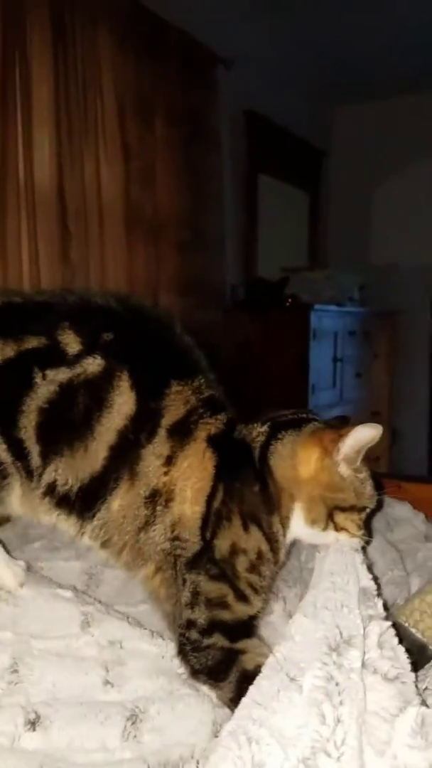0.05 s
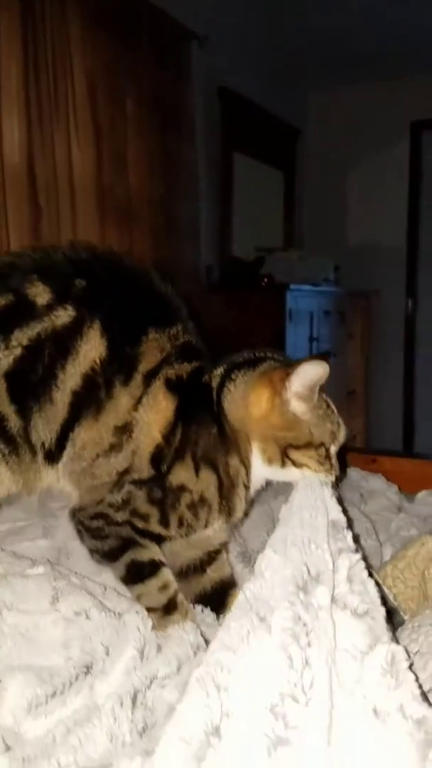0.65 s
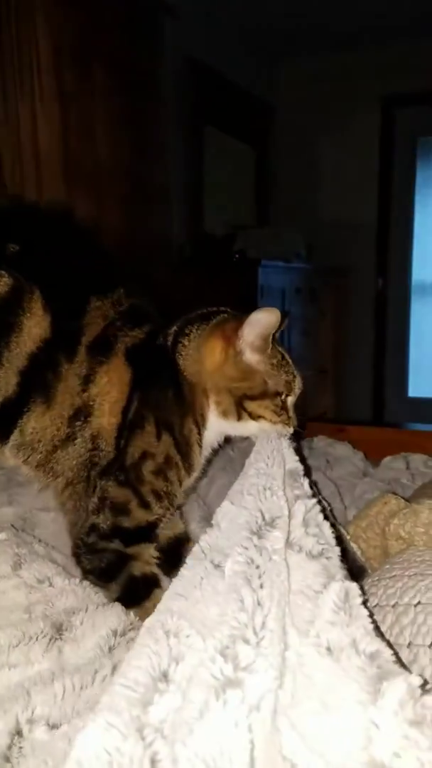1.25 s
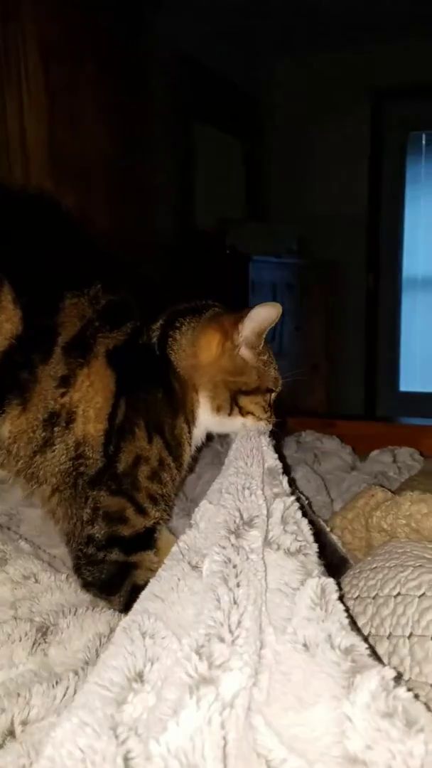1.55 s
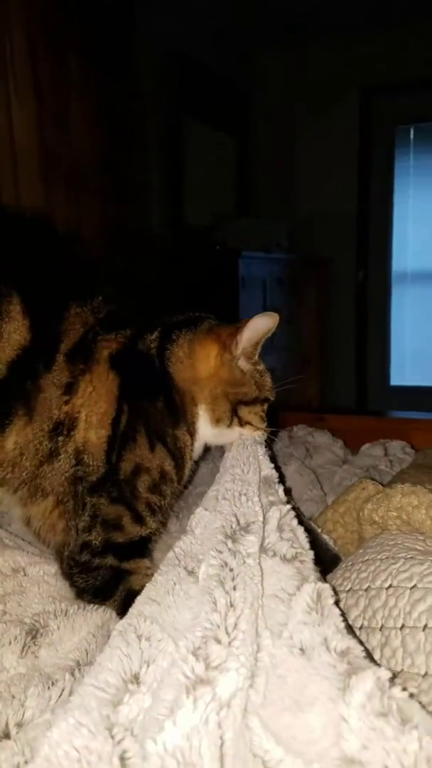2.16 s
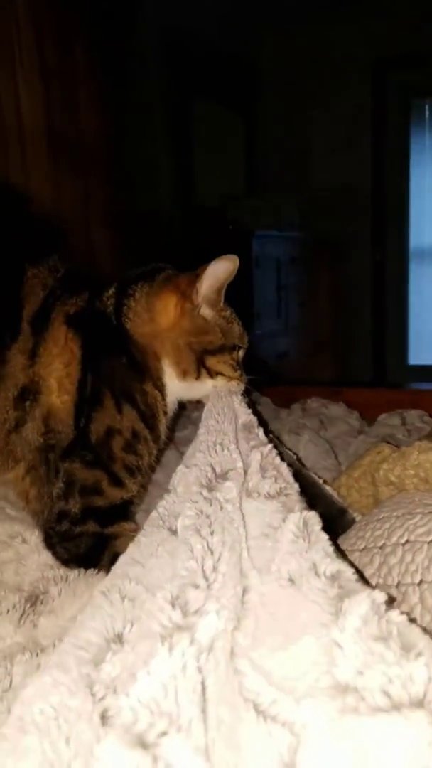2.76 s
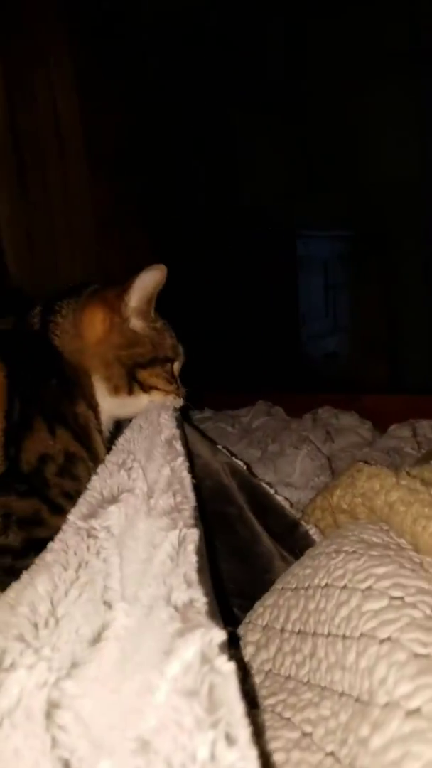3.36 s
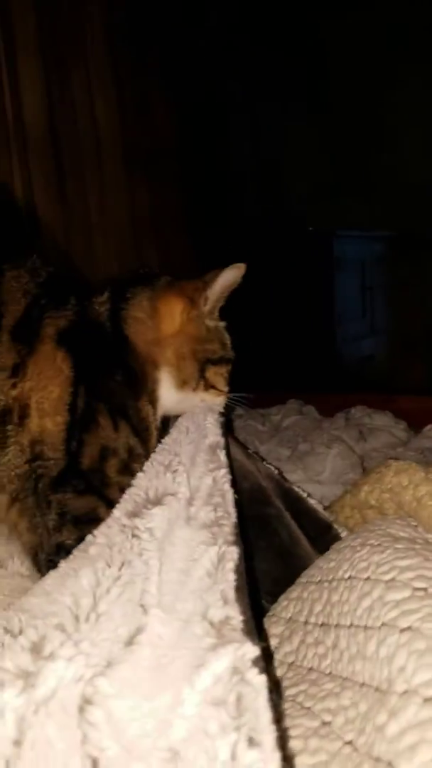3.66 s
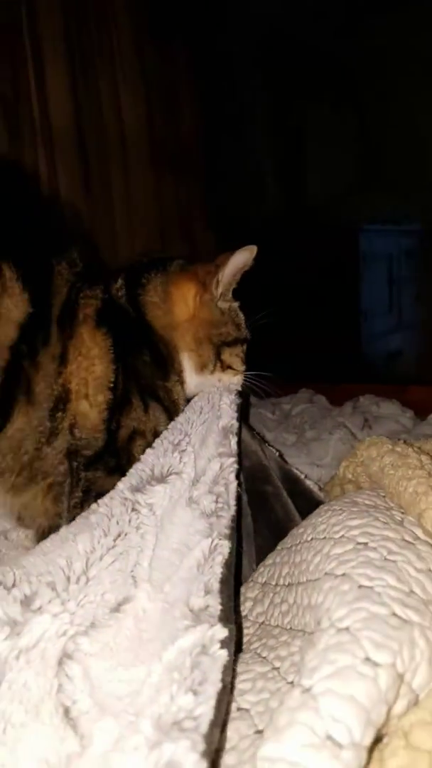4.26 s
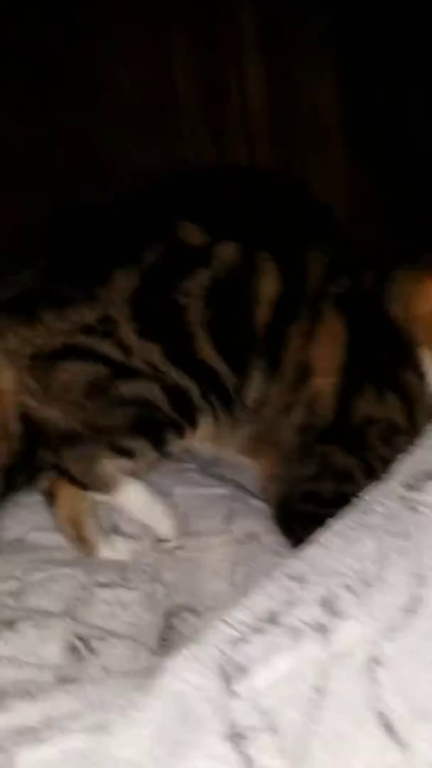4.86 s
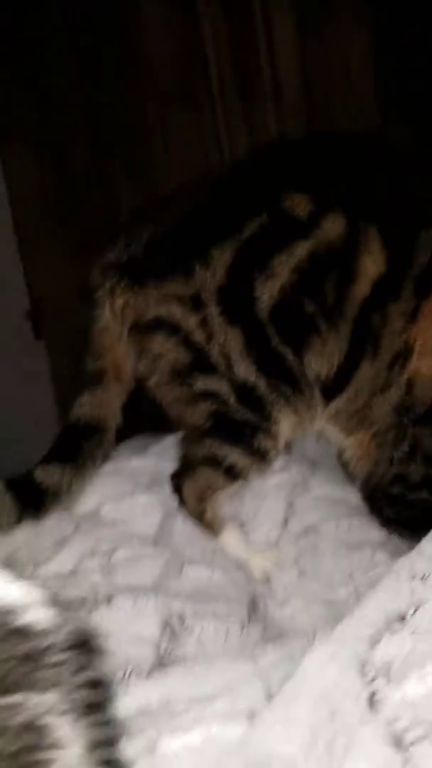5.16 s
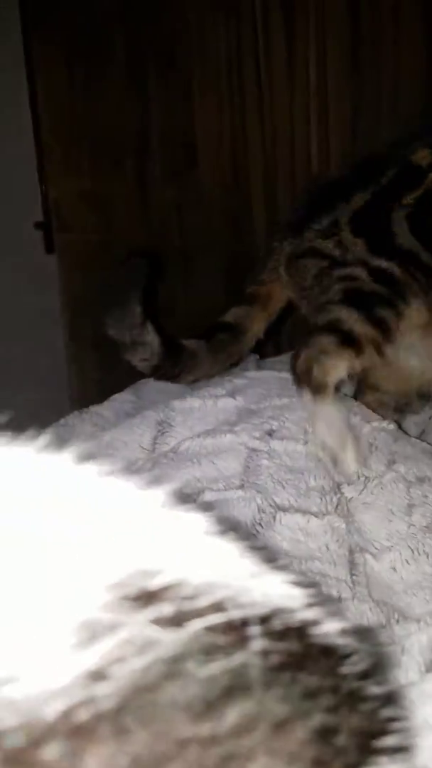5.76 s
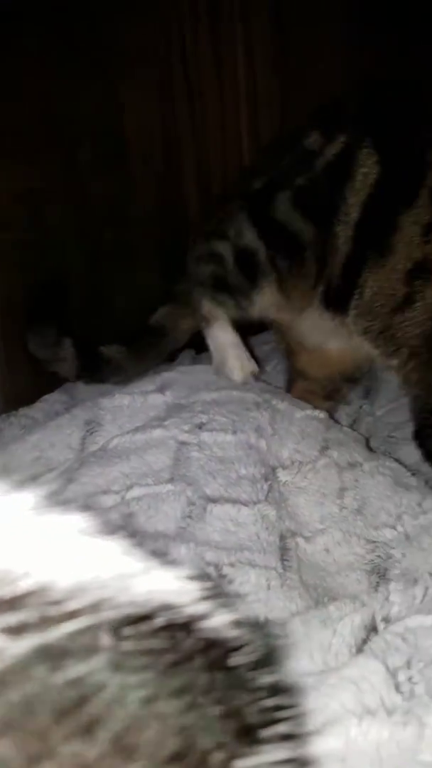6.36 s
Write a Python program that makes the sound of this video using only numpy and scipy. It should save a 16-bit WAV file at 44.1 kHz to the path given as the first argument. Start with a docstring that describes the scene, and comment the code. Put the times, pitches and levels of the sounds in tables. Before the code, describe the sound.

A fan hums quietly in a bedroom while a handheld phone gets soft bumps, a brief fabric swish and one sharp pop.

```python
"""A fan hums and rushes in a quiet bedroom, over a low house rumble and faint microphone hiss.
A cat tugs silently at a plush blanket, close to a hand-held phone. The hand bumps the phone's case,
which thuds, rings and, at the hardest bump, clicks. About three seconds in, fabric swishes and
scrapes past the right microphone. Near the end, one sharp pop hits the left one."""
import sys
import numpy as np
from scipy.fft import rfft, irfft, next_fast_len
from scipy.io import wavfile
from scipy.ndimage import map_coordinates

SR = 44100
rng = np.random.default_rng(int(sys.argv[2]) if len(sys.argv) > 2 else 0)


def generate_wav(sig):
    """Save sig (samples, or channels by samples) to the path in sys.argv[1] as 16-bit PCM at SR."""
    pcm = np.round(np.clip(np.atleast_2d(sig).T, -1, 1) * 32767).astype(np.int16)
    wavfile.write(sys.argv[1], SR, pcm)


N = 287532
TIME_S = np.arange(N) / SR


def amp(db):
    """Turn decibels into a number to multiply by."""
    return 10 ** (np.asarray(db) / 20)


def unit(x):
    """Scale a sound to an average (rms) level of 1."""
    return x / np.sqrt(np.mean(x ** 2) + 1e-20)


def over_pitch(rows, hz):
    """Join (pitch_hz, value) rows into a curve, giving each octave equal room."""
    pitches, values = np.transpose(rows)
    return np.interp(np.log(hz + 1), np.log(pitches + 1), values)


def over_time(rows):
    """Join (time_s, value) rows into a curve, one value per sample."""
    return np.interp(TIME_S, *np.transpose(rows))


def wobble(rate):
    """A smooth curve through `rate` random values a second."""
    values = rng.standard_normal(int(N * rate / SR) + 4)
    return map_coordinates(values, [TIME_S * rate])


def swell(peak_s, rise_s, fall_s):
    """A smooth rise to 1 at peak_s and a smooth fall."""
    t = TIME_S - peak_s
    return np.exp(-(t / np.where(t < 0, rise_s, fall_s)) ** 2)


def filtered(x, response):
    """Multiply each frequency in a sound by response(hz)."""
    size = 2 * next_fast_len(N // 2 + SR // 4)
    hz = np.fft.rfftfreq(size, 1 / SR)
    return irfft(rfft(x, size) * response(hz), size)[..., :N]


def coloured(x, colour):
    """Give a sound a colour (its mix of low and high), at an average level of 1."""
    return unit(filtered(x, lambda hz: amp(over_pitch(colour, hz))))


def panned(x, balance_db):
    """Make the left side louder than the right by balance_db."""
    return x * np.vstack([amp(balance_db / 2), amp(-balance_db / 2)])


def tone(hz, drift):
    """A slightly unsteady tone at an average level of 1."""
    phase = 2 * np.pi * (hz * TIME_S + rng.random())
    return unit(np.sin(phase + drift * wobble(3.95)))


# How alike the room sounds at the two microphones: pitch_hz, likeness (0 to 1)
STEREO_LIKENESS = [(60, 1), (290, 0.72), (640, 0.15), (1400, 0.21), (3100, 0.097), (7000, 0)]

def room_noise(colour):
    """Noise from all around: both microphones share the bass but not the treble."""
    def shares(hz):
        angle = np.arccos(np.clip(over_pitch(STEREO_LIKENESS, hz), -1, 1)) / 2
        return np.array([np.cos(angle), np.sin(angle)])
    shared, opposite = filtered(rng.standard_normal((2, N)), shares)
    return coloured(np.array([shared + opposite, shared - opposite]), colour)


SHAFT_HZ, HUM_BALANCE_DB = 52.24, -2.5  # the fan's turns a second; the hum leans right
# The main motor tone, at 4 times the shaft speed: time_s, level_db
MAIN_TONE_LEVELS = [(0.0, -66), (1.2, -66.5), (1.5, -72), (1.87, -61.5), (2.2, -68), (2.92, -73),
                    (3.7, -62), (5.47, -66), (5.72, -61.5), (6.52, -79)]
# The upper motor tone, at 6 times the shaft speed: time_s, level_db
UPPER_TONE_LEVELS = [(0.0, -61), (0.49, -71), (0.87, -60), (1.03, -74.5), (1.85, -70.5), (2.27, -78),
                     (2.91, -76), (3.74, -74), (3.98, -67), (5.25, -71), (5.57, -63.5), (6.52, -72.5)]
# Tones on either side of the upper one that swell with it: shaft_multiple, average_level_db
NEIGHBOUR_TONES = [(5, -71.5), (7, -75.5)]

def fan_hum(waver_db=1.5, drift=0.5, follow=0.75):
    """Motor tones swell and sink as the phone crosses the room's loud and quiet spots (standing waves)."""
    main_db, upper_db = over_time(MAIN_TONE_LEVELS), over_time(UPPER_TONE_LEVELS)
    swing_db = follow * (upper_db - upper_db.mean())
    tones = [(4, main_db), (6, upper_db)]
    tones += [(multiple, db + swing_db) for multiple, db in NEIGHBOUR_TONES]
    hum = sum(amp(db + waver_db * wobble(7.1)) * tone(multiple * SHAFT_HZ, drift)
              for multiple, db in tones)
    return panned(hum, HUM_BALANCE_DB)


# The fan's weaker motor tones: shaft_multiple, level_db
WEAK_FAN_TONES = [(2, -71.5), (3, -69)]
# Other steady drones of the house: pitch_hz, level_db
HOUSE_DRONES = [(43.5, -69), (119.5, -68), (383, -78), (689, -79.5)]
# The colour of the rumble: pitch_hz, relative_db
RUMBLE_COLOUR = [(10, -22), (22, -8), (35, 5), (70, -1.5), (120, 4), (185, -1.5), (340, -2.5), (450, -3.5),
                 (700, -13.5), (1500, -42)]

def house_rumble(rumble_db=-61, waver_db=2.1, drift=0.64, fade_start_s=6.17, fade_db_per_s=15):
    """Weak drones waver over the low rumble of the house; both fade at the very end."""
    tones = [(multiple * SHAFT_HZ, db) for multiple, db in WEAK_FAN_TONES] + HOUSE_DRONES
    drones = sum(amp(db) * unit(amp(waver_db * wobble(2.63)) * tone(hz, drift)) for hz, db in tones)
    rumble = amp(rumble_db) * room_noise(RUMBLE_COLOUR)
    fade_db = fade_db_per_s * np.maximum(TIME_S - fade_start_s, 0)
    return panned(amp(-fade_db) * (drones + rumble), HUM_BALANCE_DB)


# The rush of air as the phone moves about the bed: time_s, level_db (before boost_db is added)
RUSH_LEVELS = [(0.0, -59.5), (2.38, -61), (2.89, -61), (3.12, -60), (4.81, -59), (6.52, -61.5)]
# The colour of the broad rush: pitch_hz, relative_db
RUSH_COLOUR = [(100, -15), (350, -10.5), (550, -3), (720, -3), (1000, 0), (1700, -1.5), (2200, -6.5),
               (3100, -11), (4400, -20), (6200, -26), (9000, -28), (16000, -46)]
# The colour of its narrow, hollow part: pitch_hz, relative_db
HOLLOW_COLOUR = [(400, -43), (600, -16), (690, 2), (900, 3), (1050, -15), (1600, -39)]

def fan_rush(boost_db=2, flutter_db=0.51, hollow_db=-69.5, hollow_growth=6):
    """The fan's rush of air: the louder it arrives, the hollower it sounds."""
    level_db = over_time(RUSH_LEVELS)
    broad = amp(level_db + boost_db + flutter_db * wobble(9.9)) * room_noise(RUSH_COLOUR)
    swing_db = hollow_growth * (level_db - level_db.mean())
    hollow = amp(hollow_db + swing_db) * room_noise(HOLLOW_COLOUR)
    return panned(broad + hollow, balance_db=2.5)


# The colour of the hiss: pitch_hz, relative_db
HISS_COLOUR = [(1000, -6), (5000, -5), (8000, -11.5), (10200, -8), (12500, -2), (15500, 0)]

def microphone_hiss(level_db=-70.5):
    """Each microphone makes its own faint hiss."""
    hiss = coloured(rng.standard_normal((2, N)), HISS_COLOUR)
    return panned(amp(level_db) * hiss, balance_db=2)


# The hand's bumps on the case: start_s, level_db, contact_s, ring_vs_thud_db, left_minus_right_db
HAND_BUMPS = [(.130, -42, 0.0011, -8, -5), (.182, -40.5, .001, -10.5, -5),
              (1.0148, -41.5, 0.00011, -12, -3), (1.669, -49, .001, -6, -1),
              (1.7516, -29.5, 0.00019, -2, -2), (1.835, -44.5, 0.0012, -3, -1), (1.949, -42, .001, -7, -3),
              (3.016, -41, 0.00039, -12.5, -9), (5.5637, -31, 0.00023, -20, 1),
              (6.1164, -34, 0.00034, -17, -1)]
# The notes the held case rings with: pitch_hz, relative_db, fade_s (time to fall by 60 dB)
CASE_NOTES = [(48, -7, 0.11), (106.7, -1.5, 0.15), (133, 0.5, 0.091), (164, -4, 0.075), (210, -9, 0.17),
              (292, -4, 0.071), (386, -9.5, 0.079), (490, -17, 0.071)]

def hand_bumps(thud_hz=185, thud_fade_s=0.013):
    """Each bump gives the phone one quickly stopped swing, a thud; then its case rings."""
    track = np.zeros((2, N + SR))
    t = np.arange(SR // 2) / SR
    thud = np.cos(2 * np.pi * thud_hz * t) * amp(-60 * t / thud_fade_s)
    for start_s, level_db, contact_s, ring_db, balance_db in HAND_BUMPS:
        ring = sum(amp(db + rng.normal(0, 1) - 60 * t / fade_s) * np.cos(2 * np.pi * hz * t)
                   for hz, db, fade_s in CASE_NOTES)
        ring *= 1 - np.exp(-t / 0.002)  # the case takes a moment to start ringing
        onset = 1 - np.exp(-(t / contact_s) ** 2)  # softer contact, duller sound
        bump = amp(level_db) * onset * (thud + amp(ring_db) * ring)
        start = round(start_s * SR)
        track[:, start:start + len(t)] -= panned(bump, balance_db)
    return track[:, :N]


# Dry clicks of the case at the hardest bump: start_s, level_db
CASE_CLICKS = [(1.752, -43), (1.7588, -52), (1.7628, -54)]
# The colour of a click: pitch_hz, relative_db
CLICK_COLOUR = [(600, -7), (1500, 4), (2800, 10), (4300, -16), (6000, -11), (9000, -7), (13000, -11),
                (16000, -11)]

def case_clicks(fade_s=0.0048):
    """The plastic case clicks and settles: tiny bursts of noise."""
    bursts = sum(amp(db - 60 * np.abs(TIME_S - start_s) / fade_s) * (TIME_S >= start_s)
                 for start_s, db in CASE_CLICKS)
    noise = coloured(rng.standard_normal((2, N)), CLICK_COLOUR)
    return panned(bursts * noise, balance_db=6)


# Strokes of fabric past the right microphone: peak_s, swish_db, scrape_db, rise_s, fall_s
FABRIC_STROKES = [(3.04, -62.5, -58, .2, 0.072), (3.28, -66.5, -58, 0.044, 0.11)]
# The colour of the bright swish: pitch_hz, relative_db
SWISH_COLOUR = [(500, -20), (2400, 4), (3300, 7), (4300, -3.5), (6500, -1.5), (8000, -5), (9300, 1.5),
                (11000, -1), (15500, -2)]
# The colour of the low scrape: pitch_hz, relative_db
SCRAPE_COLOUR = [(25, -14), (90, 1), (220, 1), (400, -3), (700, -13), (1600, -9), (3000, -22), (6000, -38),
                 (12000, -48)]

def fabric_brush(snag_s=3.019, jolts_per_s=700, jolt_db=-1, left_vs_right_db=-15):
    """Fibres swish past the right microphone; pressed harder, they catch and let go in tiny jolts."""
    snag = swell(snag_s, rise_s=0.0093, fall_s=0.022)  # the fabric snags once...
    slip = swell(snag_s + 0.021, rise_s=0.013, fall_s=0.013)  # ...and slips free
    swish_gain = amp(-65) * slip
    scrape_gain = amp(-44.5) * snag + amp(-53) * slip
    for peak_s, swish_db, scrape_db, rise_s, fall_s in FABRIC_STROKES:
        stroke = swell(peak_s, rise_s, fall_s)
        swish_gain += amp(swish_db) * stroke
        scrape_gain += amp(scrape_db) * stroke
    flicker = amp(1.6 * wobble(250))
    swish = coloured(flicker * rng.standard_normal(N), SWISH_COLOUR)
    jolts = (rng.random(N) < jolts_per_s / SR) * rng.standard_normal(N)
    scrape = coloured(amp(jolt_db) * unit(jolts) + rng.standard_normal(N), SCRAPE_COLOUR)
    right = swish_gain * swish + scrape_gain * scrape
    return np.array([amp(left_vs_right_db) * right, right])


# How the microphone's small opening colours the pop: pitch_hz, gain_db
OPENING_COLOUR = [(100, 1), (2000, 0), (4000, -1.5), (6000, -5), (8000, -10), (9200, -14), (10800, -1.5),
                  (13500, 11), (16000, 6)]

def microphone_pop(start_s=5.97628, gain_db=-1, bass_cut_hz=98, rise_s=0.00004):
    """A sudden step at the left microphone; its bass cut turns the step into a spike and one dip."""
    def opening(hz):
        # Build the filter so that it rings only after the hit, never before (minimum phase).
        cepstrum = irfft(np.log(amp(over_pitch(OPENING_COLOUR, hz))))
        half = len(cepstrum) // 2
        cepstrum[1:half] *= 2
        cepstrum[half + 1:] = 0
        return np.exp(rfft(cepstrum))
    t = np.maximum(TIME_S - start_s, 0)
    step = 1 - np.exp(-t / rise_s)
    swing = np.sqrt(2) * np.pi * bass_cut_hz * t
    spike = step * np.exp(-swing) * (np.cos(swing) - np.sin(swing))
    return np.array([amp(gain_db) * filtered(spike, opening), np.zeros(N)])


def scene():
    """The steady background with the handling noises on top."""
    background = fan_hum() + house_rumble() + fan_rush() + microphone_hiss()
    return background + hand_bumps() + case_clicks() + fabric_brush() + microphone_pop()


def record(dry):
    """The phone cuts off the very highest treble."""
    return filtered(dry, lambda hz: hz < 15750)


dry = scene()
out = record(dry)
generate_wav(out)
```